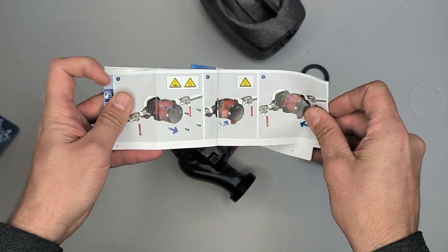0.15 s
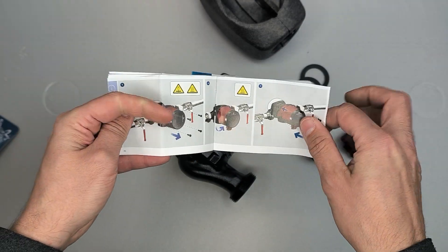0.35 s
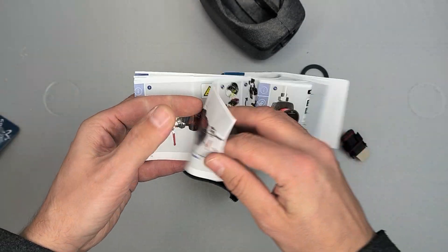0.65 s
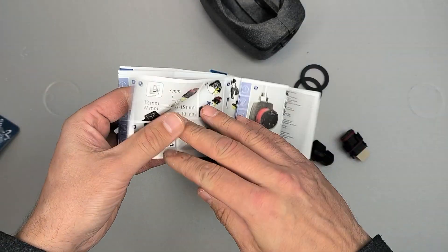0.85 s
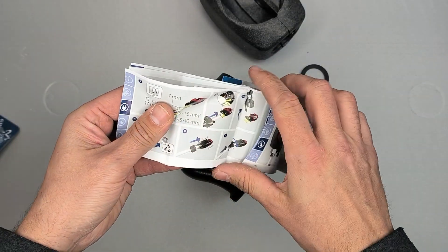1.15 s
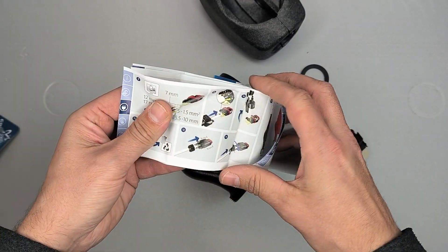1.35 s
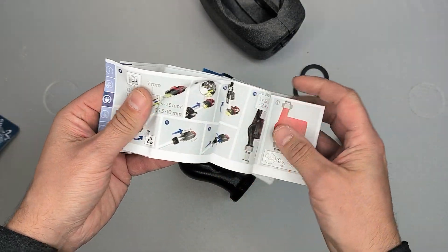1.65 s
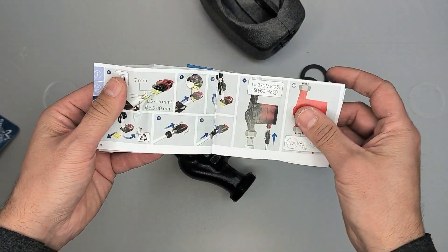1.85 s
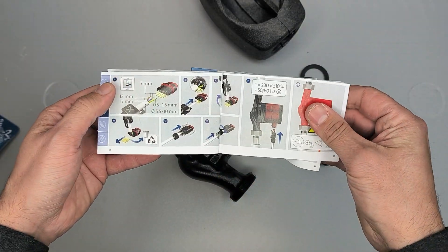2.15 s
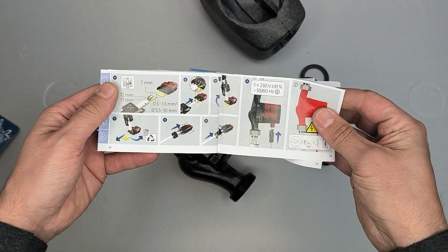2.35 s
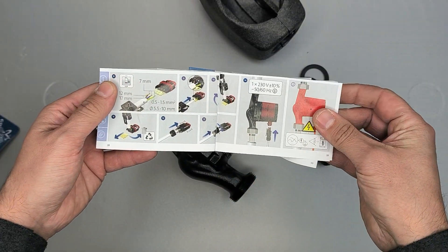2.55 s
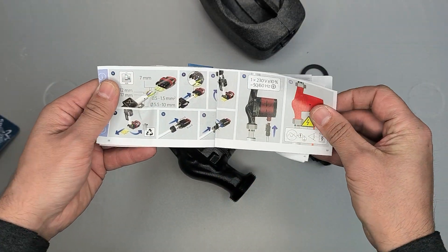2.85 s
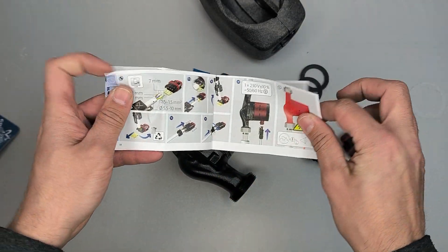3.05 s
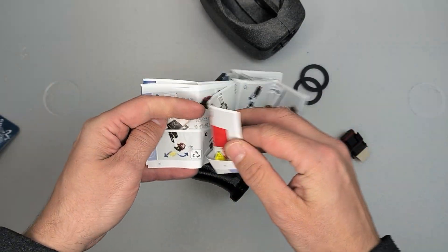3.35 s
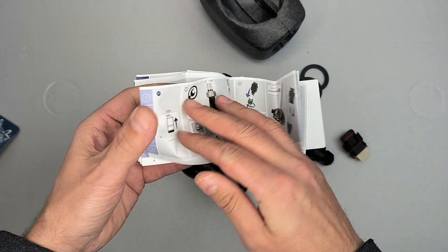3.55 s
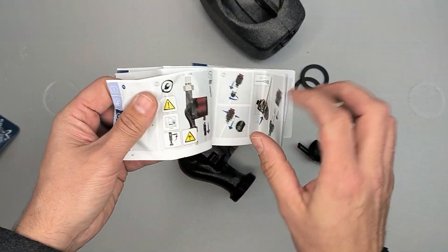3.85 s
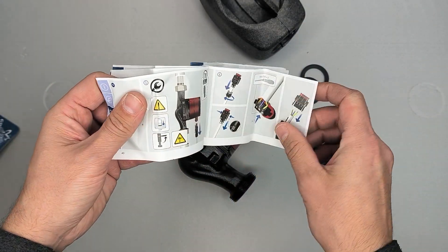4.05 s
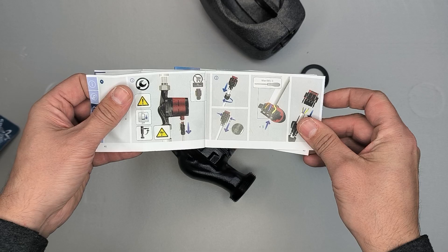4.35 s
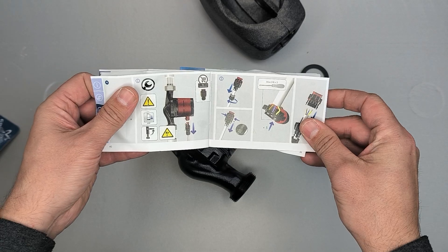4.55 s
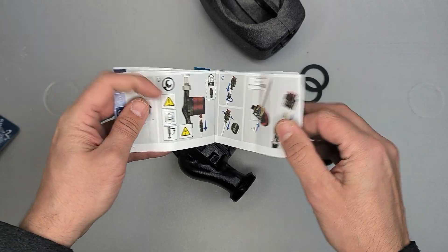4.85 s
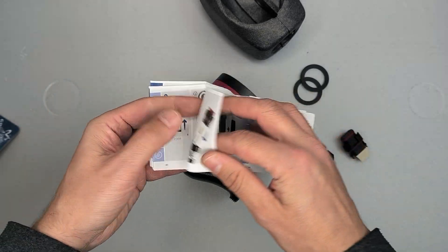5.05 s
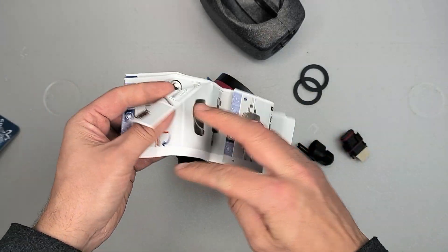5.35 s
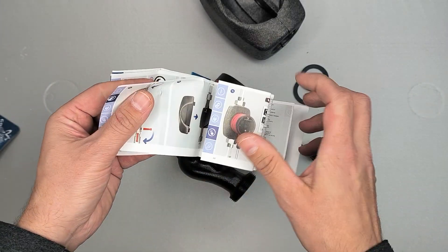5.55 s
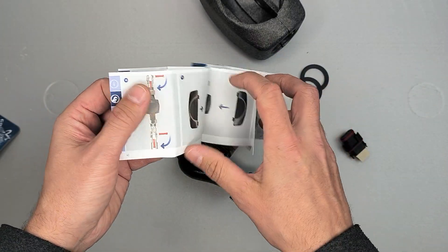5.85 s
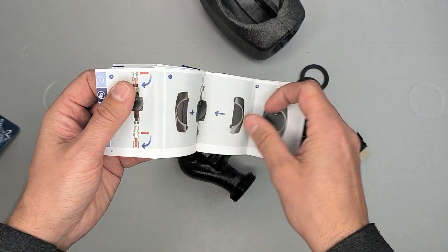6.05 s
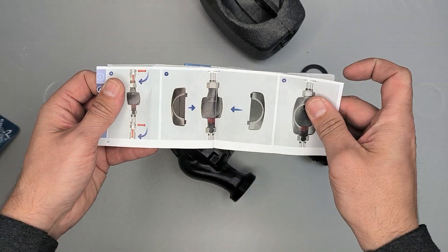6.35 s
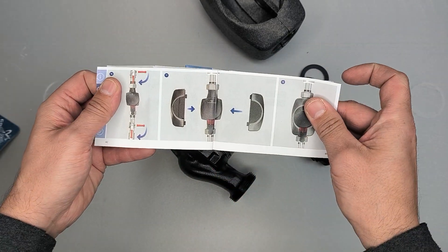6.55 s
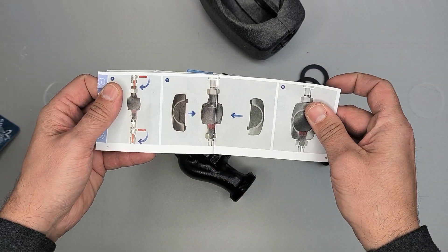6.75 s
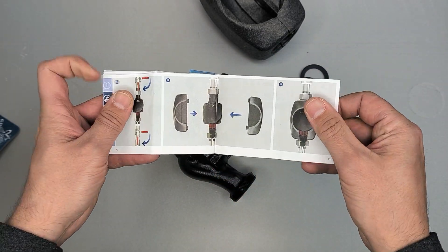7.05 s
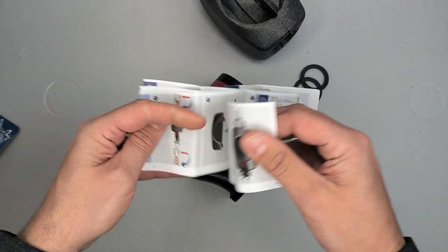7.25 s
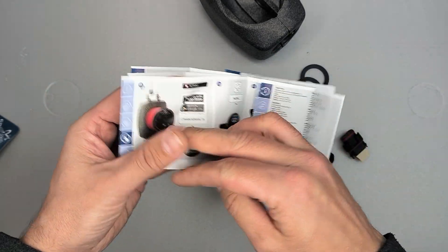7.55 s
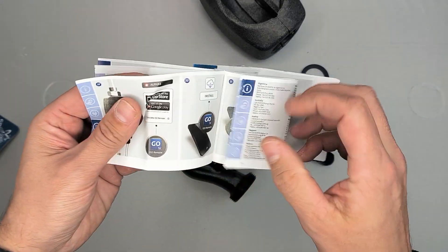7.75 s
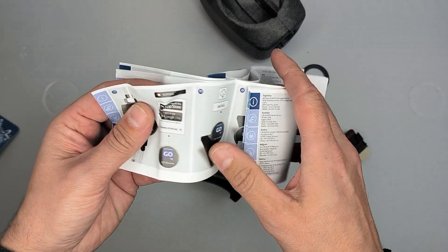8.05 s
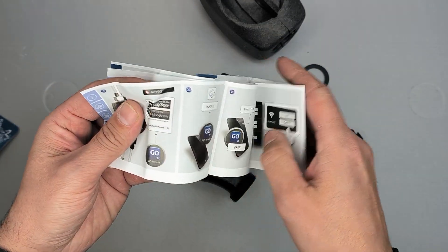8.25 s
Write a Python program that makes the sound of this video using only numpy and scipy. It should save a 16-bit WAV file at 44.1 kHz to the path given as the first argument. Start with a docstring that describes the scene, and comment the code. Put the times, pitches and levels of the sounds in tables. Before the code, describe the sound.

Two hands leaf through a small stiff folded leaflet close to a stereo microphone. Light finger rubs lead to a cluster of dry creasing snaps and papery swishes, then quiet handling. More page turns crackle in separate bursts, including one sharp snap near the middle and another near the end. A low fan hum drones steadily beneath, with short indoor reverberation and very faint hiss.

```python
"""Two hands unfold a stiff paper leaflet and turn its pages in a small room; a fan drones throughout.
Finger rubs (friction noise) open; creases snap (short noise bursts) in a tight cluster near 1 s.
Pages sweep over each other (swelling friction, ringing air pocket); snaps peak near 3.8 s.
An even riffle of seven ticks starts at 4.5 s; snaps continue, then thin out to faint ticks near 6.7 s.
Hard snaps return from 7 s and peak near 7.66 s; a last sweep and a light rub end the scene."""
import sys
import numpy as np
from scipy import signal
from scipy.fft import rfft, irfft
from scipy.io import wavfile

SR = 44100
rng = np.random.default_rng(int(sys.argv[2]) if len(sys.argv) > 2 else 0)


def pcm_store(signal):
    """Save signal as 16-bit PCM."""
    levels = np.round(np.clip(np.atleast_2d(signal), -1, 1) * 32767)
    wavfile.write(sys.argv[1], SR, levels.astype(np.int16).T)


N = 370881
HZ = np.fft.rfftfreq(N, 1 / SR)
TIME_S = np.arange(N) / SR
LEAD_S = 0.008  # snap envelopes start this long before the snap


def amp(db):
    """Decibels to gain."""
    return 10 ** (np.asarray(db) / 20)


def unit(x):
    """Scales to an rms of one."""
    return x / np.sqrt(np.mean(x ** 2) + 1e-20)


def read(points, hz):
    """Interpolates a frequency table on a log-frequency axis."""
    point_hz, value = np.transpose(points)
    return np.interp(np.log(hz + 1), np.log(point_hz + 1), value)


def bell(centre_hz, width_hz):
    """Power shape of one resonance, one at its centre."""
    return 1 / (1 + (2 * (HZ - centre_hz) / width_hz) ** 2)


def colour(x, gain_db):
    """Minimum-phase filter, built by folding the cepstrum of the gain over HZ."""
    cepstrum = irfft(np.log(amp(gain_db)), N)[:N // 2]
    cepstrum[1:] *= 2
    size = 2 ** 19
    response = irfft(np.exp(rfft(cepstrum, size)), size)[:2 ** 11]
    return signal.oaconvolve(x, response[None], axes=1)[:, :N]


def radiate(x, spectrum):
    """Colours a white drive with a spectrum and keeps its power."""
    gain_db = read(spectrum, HZ)
    mean_power = np.mean(amp(gain_db) ** 2)
    return colour(x, gain_db - 10 * np.log10(mean_power))


def wander(rate_hz):
    """Random curve of rms one, linear between rate_hz new values a second."""
    knots = rng.standard_normal(2 ** 14)
    return unit(np.interp(TIME_S * rate_hz, np.arange(len(knots)), knots))


def add(mix, start_s, sound):
    """Mixes a multichannel sound in at start_s."""
    part = mix[:, max(round(start_s * SR), 0):][:, :sound.shape[1]]
    part += sound[:, :part.shape[1]]


def snaps(rows, crack_same=0.73, thud_db=-9, thud_growth=1.9):
    """A crease flips in an instant; bending waves then scatter through the sheet. Drives: knock, 3 bands."""
    drives = np.zeros((4, 2, N))
    for snap_s, db, body_db, crisp_db, pan_db in rows:
        crack, flutter = snap_shapes(db)
        noise = rng.choice([-1., 1.], (5, len(crack)))
        # crack mostly alike at both microphones, flutter from all over the sheet
        crack_noise = np.sqrt(crack_same) * noise[0] + np.sqrt(1 - crack_same) * noise[1:3]
        burst = crack * crack_noise + flutter * noise[3:]
        burst *= amp(db) * unit(amp([[pan_db / 2], [-pan_db / 2]]))
        knock_db = thud_db + thud_growth * body_db  # the duller, the more knock
        shares = amp([knock_db, body_db, 0, crisp_db])
        shares /= np.linalg.norm(shares)
        for drive, share in zip(drives, shares):
            add(drive, snap_s - LEAD_S, share * burst)
    return drives


def snap_shapes(db, soft_rise_s=0.0023, hard_rise_s=0.00052, crack_s=0.0014,
                flutter_s=0.0073, flutter_db=-9, lead_in_db=-19, lead_in_s=0.0078):
    """Envelopes of a crack and its flutter: the harder the snap, the faster the crease flips."""
    t = np.arange(2 ** 11) / SR - LEAD_S
    rise_s = np.interp(db, [-50, -35], [soft_rise_s, hard_rise_s])
    before, after = np.maximum(-t, 0), np.maximum(t, 0)
    flip = np.exp(-(before / rise_s) ** 2)
    lead_in = amp(lead_in_db) * np.exp(-before / lead_in_s)  # a faint lead-in swells before the flip
    crack = flip * np.exp(-after / (crack_s + rise_s - hard_rise_s))
    flutter = np.maximum(amp(flutter_db) * flip, lead_in) * np.exp(-after / flutter_s)
    # same energy as 6 ms at full level
    scale = np.sqrt(0.006 * SR / np.sum(crack ** 2 + flutter ** 2))
    return scale * crack, scale * flutter


# Buckling creases and flicked edges. Each row: time in seconds, level in dB, body in dB re the middle
# band, crispness in dB re the middle band, left minus right in dB.
CREASES = [(0.0354, -37, -8, -1.5, 12), (0.5543, -45, 2.5, -26, -2), (0.7447, -46, 7, -16, 1),
           (0.905, -43, -6, -10, -3), (1.0075, -31.5, -10, -4, 0), (1.0164, -31.5, -4, -8, -3),
           (1.0327, -29, -24, -1, 5), (1.037, -30, -7, -2, 0), (1.1441, -44, -1, -5, 2),
           (1.3585, -40, -2, 3, 2), (1.378, -36, -15, -1, -18), (1.385, -33, -3.5, 2, 4),
           (1.577, -37, 1, -6, -4), (1.799, -33, -6.5, -1.5, -9), (1.8635, -40.5, -25, -21, -2),
           (2.8731, -43.5, 3, 7, 3), (3.0447, -33.5, -6.5, -27, -2), (3.16, -29.5, -15, -3.5, 5),
           (3.1712, -34, -4.5, -11, -2), (3.3163, -37.5, 3.5, -28, -3), (3.4475, -32, -1, -10, -1),
           (3.4808, -28.5, -5, -9, -11), (3.4851, -33, -3, -12, 0), (3.4925, -26.5, -10, 0, 2),
           (3.6075, -27.5, -6, 10, -0.5), (3.782, -36, -5.5, -6, -3), (3.8081, -20, -7.5, -7, -3),
           (4.3112, -47, -15, -10, 2), (4.7185, -35.5, 1.5, -22, -1), (4.7414, -27, -15, -15, 0.5),
           (4.874, -41.5, -14, -9, 15), (5.0694, -49, 3, -2, 0), (5.1903, -36.5, -4, 1, -1),
           (5.3682, -34.5, -1, -5, -9), (5.3846, -35, -6, -3, 1), (5.4189, -28.5, -10, -7, 0),
           (5.4326, -33.5, -23, -5, 10), (5.9326, -28, -4, -17, -2), (6.381, -40, -18, 0, -2),
           (6.4964, -46.5, -8, -12, -1), (6.5838, -56.5, -16, 1, 13), (6.691, -54, 0, 4, -1),
           (6.8293, -53, 0, -4, 0), (7.0523, -25.5, -12, 0.5, 1), (7.0775, -26.5, -9, -3, -0.5),
           (7.164, -31.5, -6, -16, -0.5), (7.3887, -38, 7, -2, 3), (7.469, -29, -9, -16, 1),
           (7.5024, -31.5, -9, -6, 0), (7.6422, -35, -25, -8, 1), (7.6562, -21, -12.5, -5.5, 0.5),
           (7.7016, -40.5, -5, -3, -5), (8.1002, -47, 0, -6, -2)]


def creases():
    """Stiff creases buckle and edges flick: dry snaps at set times."""
    return list(CREASES)


# Fingertips landing on the leaflet. Each row: time in seconds, level in dB before level_db.
FINGER_TAPS = [(0.205, -47.5), (0.434, -47.5), (0.6056, -47.5), (1.887, -50.5), (2.202, -55), (2.2434, -52),
               (3.3805, -45), (4.0812, -53), (4.203, -50.5), (4.3027, -43.5), (4.893, -49), (6.1794, -53),
               (6.3, -51), (6.323, -50.5), (7.32, -48)]


def taps(body_db=8, crisp_db=-3, level_db=1):
    """A fingertip is a soft, dull blow in the middle of the sheet."""
    return [(tap_s, db + level_db, body_db, crisp_db, 0) for tap_s, db in FINGER_TAPS]


def riffle(start_s=4.5065, period_s=0.0273, first_db=-51, last_db=-40, body_db=1, crisp_db=0, count=7):
    """A thumb drags the sheet taut, catching and slipping at an even pace, a little harder each time."""
    levels_db = np.linspace(first_db, last_db, count)
    return [(start_s + k * period_s, db, body_db, crisp_db, 0) for k, db in enumerate(levels_db)]


# A page sweeps over the sheet below. Each row: time of greatest force in seconds, rise in seconds,
# fall in seconds, level in dB before level_db or lift_db, body in dB re the middle band, crispness in
# dB re the middle band, air pocket in Hz, its ring in dB re the friction before ring_db.
PAGE_SWEEPS = [(0.777, 0.028, 0.018, -41.5, -3.5, -2.5, 2720, -6),
               (0.811, 0.019, 0.027, -44, -1.5, -12, 3000, -1), (1.02, 0.06, 0.034, -51.5, 1, -13, 2240, 3),
               (1.23, 0.011, 0.015, -48, -5, -3, 2640, 3), (1.395, 0.036, 0.023, -52, 1, -4, 1940, -18),
               (1.582, 0.034, 0.036, -42.5, -6, -1.5, 1910, -3.5),
               (1.801, 0.046, 0.032, -41.5, -5.5, -3, 2240, -7),
               (1.88, 0.029, 0.027, -48, -7, -7, 2170, -11), (3.322, 0.022, .025, -61, 9, -16, 2280, -1),
               (3.484, 0.044, 0.066, -46, -4, -5, 2400, -13), (3.812, 0.018, .022, -42, -7, -5, 2300, -6),
               (4.746, 0.051, 0.059, -51, -9, -2, 2440, -22), (5.185, 0.062, 0.034, -48, -4, -4, 1940, -21),
               (5.384, 0.02, 0.039, -44, -4, -1, 2430, -2.5),
               (7.459, 0.021, .055, -42.5, -3.5, -3.5, 1870, -8),
               (7.69, 0.037, 0.099, -59, -13, -3, 2350, 3),
               (8.195, 0.043, 0.043, -50.5, -12.5, -4.5, 2360, -5),
               (8.282, 0.014, 0.015, -47, -13.5, -3, 2400, -18)]


def sweeps(level_db=-1, patchy_db=2.5, pocket_width_hz=330, ring_db=-1,
           flex_octaves=0.056, roundness=1.38, count=2 ** 15):
    """Force builds and lets go as a page sweeps; the air pocket under it rings. Three band drives, ring."""
    scrape = friction(grain=0.78, slips_per_s=850, spread_db=1.0, uneven_db=4.0)
    flex = wander(30)
    drives, ring = np.zeros((3, 2, N)), np.zeros((2, N))
    for peak_s, rise_s, fall_s, db, body_db, crisp_db, pocket_hz, pocket_db in PAGE_SWEEPS:
        middle = round(peak_s * SR)
        span = slice(middle - count // 2, middle + count // 2)
        t = TIME_S[span] - peak_s
        force = np.exp(-abs(t / np.where(t < 0, rise_s, fall_s)) ** roundness)
        drive = scrape[:, span] * amp(db + level_db) * force
        drives[:, :, span] += amp([body_db, 0, crisp_db])[:, None, None] * drive
        moving_hz = pocket_hz * 2 ** (flex_octaves * flex[span])  # wavers as the sheet flexes
        ring[:, span] += resonate(drive * amp(pocket_db + ring_db), moving_hz, pocket_width_hz)
    # each slip shakes a different part of the sheet, so the bands flicker apart
    patchy = [band * unit(amp(patchy_db * wander(150))) for band in drives]
    return np.array(patchy), ring


def crinkles(lift_db=-4, spread_db=2, scatter_db=4, count=5):
    """Each sweeping page buckles in a few small places around its moment of greatest force."""
    rows = []
    for peak_s, rise_s, fall_s, db, body_db, crisp_db, _, _ in PAGE_SWEEPS:
        places = (np.arange(count) + rng.random(count)) / count
        for place, (size, tone, side) in zip(places, rng.standard_normal((count, 3))):
            crinkle_s = peak_s - rise_s + place * (rise_s + fall_s)
            rows.append((crinkle_s, db + lift_db + spread_db * size,
                         body_db + scatter_db * tone, crisp_db, scatter_db * side))
    return rows


# Fingers brushing along a page. Each row: start in seconds, length in seconds, level in dB before
# level_db or lift_db, crispness in dB re the middle band.
FINGER_RUBS = [(0.0, 0.026, -47.5, 0.5), (0.074, 0.067, -58.5, -1), (0.16, 0.08, -55, 0.5),
               (0.332, 0.079, -58, 1.5), (0.401, 0.04, -54.5, -1), (0.486, 0.11, -57, -7.5),
               (0.653, 0.059, -59.5, -3), (0.861, 0.038, -52.5, -3), (0.928, 0.058, -48.5, 0),
               (1.11, 0.076, -55, -3), (1.258, 0.15, -56, -7), (1.43, 0.086, -52, -9),
               (1.463, 0.12, -49, -5), (1.622, .13, -51.5, -3.5), (1.906, 0.094, -58.5, -1.5),
               (2.024, .11, -54.5, -1.5), (2.18, 0.065, -56.5, 0.5), (2.352, .11, -56.5, 2.5),
               (2.51, 0.07, -64, 1), (2.627, 0.15, -55, 1.5), (2.871, 0.14, -54.5, -1.5),
               (3.05, 0.12, -45, -3.5), (3.2, 0.34, -61, -2), (3.56, 0.043, -49, -6),
               (3.588, 0.023, -49, -2), (3.641, 0.078, -49, -2), (3.898, .11, -57.5, 1),
               (4.076, 0.084, -60, -2.5), (4.217, 0.041, -57.5, 1), (4.254, 0.063, -50.5, -3),
               (4.369, .06, -55.5, -1), (4.453, 0.19, -62.5, -3), (4.763, 0.1, -54, 1.5),
               (4.977, 0.031, -58, 1), (5.067, 0.074, -59, -5), (5.238, .1, -58, 1),
               (5.513, 0.043, -54.5, 2.5), (5.613, 0.064, -61.5, 2.5), (5.716, 0.16, -60, 0),
               (5.893, 0.036, -52, 1), (5.966, .07, -58, -4), (6.145, .31, -56, -2.5),
               (6.963, 0.21, -54.5, 0.5), (7.217, 0.2, -58, -4), (7.395, 0.045, -47, -1),
               (7.547, 0.06, -65, -1), (7.702, 0.11, -70, 0), (7.817, 0.072, -54.5, -8),
               (7.971, 0.16, -54, -4.5), (8.324, 0.081, -63.5, 0)]


def rubs(attack_s=0.006, release_s=0.034, level_db=-1, body_db=-64, body_growth=0.66,
         light_db=-57, holding_db=-72):
    """A finger starts fast, slides evenly, lifts off; pressing adds more hiss than body. Three band drives."""
    power = np.zeros((3, N)) + amp(holding_db) ** 2  # hands that only hold the leaflet still stir it
    t = np.arange(SR // 2) / SR
    for start_s, length_s, db, crisp_db in FINGER_RUBS:
        envelope = np.minimum(t / attack_s, 1) * np.exp(-np.maximum(t - length_s, 0) / release_s)
        bands = amp([body_db + body_growth * (db - light_db), db, db + crisp_db])
        add(power, start_s, np.outer(bands * amp(level_db), envelope) ** 2)
    scrape = friction(grain=0.27, slips_per_s=1500, spread_db=3.5, uneven_db=2.0)
    return np.sqrt(power)[:, None] * scrape


def ticks(lift_db=1, spread_db=2, body_db=0, scatter_db=5):
    """Somewhere along each rub the finger catches once."""
    rows = []
    for start_s, length_s, db, crisp_db in FINGER_RUBS:
        size, tone, side = rng.standard_normal(3)
        rows.append((start_s + rng.random() * length_s, db + lift_db + spread_db * size,
                     body_db + scatter_db * tone, crisp_db, scatter_db * side))
    return rows


def friction(grain, slips_per_s, spread_db, uneven_db, slip_s=0.00022):
    """Fibres catch and slip: a white stereo drive, from fine hiss (grain 0) to crackle (grain 1)."""
    size_db = spread_db * np.minimum(rng.exponential(1, N), 3.5)
    slips = (rng.random(N) < slips_per_s / SR) * amp(size_db) ** 2
    slip_power = signal.lfilter([1], [1, -np.exp(-1 / (slip_s * SR))], slips)
    texture = np.sqrt(1 - grain + grain * slip_power / slip_power.mean())
    return texture * rng.standard_normal((2, N)) * amp(uneven_db * wander(90))


def resonate(x, hz, width_hz):
    """Moving resonance: shifts hz to zero, smooths, shifts back; keeps the power of white noise."""
    turn = np.exp(2j * np.pi * np.cumsum(hz) / SR)
    r = np.exp(-np.pi * width_hz / SR)
    smooth = signal.lfilter([(1 - r) ** 2], [1, -2 * r, r ** 2], x / turn)
    return (turn * smooth).real * np.sqrt(8 / (1 - r))


def fold_ring(drive, hz=2750, width_hz=800, ring_db=-5):
    """The sheet bending in snaps and rubs rings the air in the folds."""
    return resonate(drive * amp(ring_db), np.full(N, hz), width_hz)


# Relative spectra of the knock of a fingertip or limp page, the bending sheet, the middle band and
# the crisp edge. Each row: frequency in Hz, density in dB per Hz.
KNOCK_SPECTRUM = [(250, -21), (600, -17.5), (950, 1.5), (1250, -2), (1700, -9), (4000, -39)]
SHEET_SPECTRUM = [(300, -18.5), (650, -3.5), (1050, -11), (1400, 0.5), (1950, 4), (2400, 7), (3200, -4.5),
                  (6000, -46)]
MIDDLE_SPECTRUM = [(1200, -60), (2000, -31), (2600, -2.5), (3800, 0), (5200, 5.5), (7200, 8.5),
                   (8200, -1.5), (11000, -29.5)]
EDGE_SPECTRUM = [(5000, -46), (7000, 6), (8100, 3), (9500, 1.5), (11500, -3.5), (13500, -6), (16000, -10)]


def leaflet(knock, body, middle, crisp):
    """The paper radiates each drive with its own spectrum."""
    dull = radiate(knock, KNOCK_SPECTRUM) + radiate(body, SHEET_SPECTRUM)
    bright = radiate(middle, MIDDLE_SPECTRUM) + radiate(crisp, EDGE_SPECTRUM)
    return dull + bright


# Decay of the room. Each row: frequency in Hz, t60 in seconds.
DECAY_T60 = [(700, 0.95), (2100, 0.61), (5500, 0.51), (9000, 0.39), (15000, 0.47)]


def room(x, echoes_db=-12, tail_db=-8, onset_s=0.00091, echo_count=8):
    """A few quick echoes from the table top and hands, then a diffuse tail."""
    hz, t, z = signal.stft(rng.standard_normal((2, 2 ** 15)), SR, nperseg=256)
    decay = amp(-60 * t / read(DECAY_T60, hz)[:, None])
    tail = signal.istft(z * decay, SR, nperseg=256)[1]
    tail *= np.clip(np.arange(tail.shape[1]) / SR / onset_s, 0, 1)
    response = amp(tail_db) * tail / np.linalg.norm(tail[0])
    for side in response:
        delays = (rng.uniform(0.0016, 0.012, size=echo_count) * SR).astype(int)
        signs = rng.choice([-1, 1], size=echo_count)
        side[delays] += amp(echoes_db) * signs / np.sqrt(echo_count)
    return signal.fftconvolve(x, response, axes=1)[:, :N]


# Relative spectrum of the fan's air noise. Each row: frequency in Hz, density in dB per Hz.
AIR_SPECTRUM = [(25, -53), (70, -42.5), (86, -20), (150, -20.5), (178, -28.5), (210, -15.5), (330, -11.5),
                (440, -16), (490, -26), (760, -29.5), (950, -40.5), (1500, -44), (3000, -61), (9000, -67)]
# Resonances the air noise excites. Each row: frequency in Hz, width in Hz, lift in dB.
AIR_MODES = [(143, 14, 3.5), (260, 9.6, 5.5), (271.7, 4.7, 15.5), (285.5, 14.4, 10.5), (346.3, 9.7, 7),
             (357, 9.2, 11.5), (380.8, 8.5, 15), (449, 8.6, 1.5)]
# Likeness of the air noise at the two microphones. Each row: frequency in Hz, coherence from 0 to 1.
AIR_COHERENCE = [(60, 1), (130, 0.7), (290, 0.94), (400, 0.72), (640, 0.078), (1400, 0), (3000, 0.0029)]
# Tones of the fan. Each row: mean frequency in Hz, rms level in dB before wavering.
TONES = [(107.9, -61), (281.8, -48.5), (363.7, -46.5), (508, -70), (586, -77.5), (728, -75.5)]


def fan(air_db=-37.5, waver_db=3.5, drift_hz=0.875):
    """Air noise booming in a few low resonances, with wavering tones."""
    size = 2 ** 19
    hz = np.fft.rfftfreq(size, 1 / SR)
    air_shape_db = read(AIR_SPECTRUM, HZ) + sum(db * bell(f, width) for f, width, db in AIR_MODES)
    left, other = rfft(rng.standard_normal((2, size)))
    same = np.clip(read(AIR_COHERENCE, hz), -1, 1)
    pair = np.array([left, same * left + np.sqrt(1 - same ** 2) * other])
    air = unit(irfft(pair * amp(np.interp(hz, HZ, air_shape_db)))[:, :N])
    tones = np.zeros(N)
    for tone_hz, db in TONES:
        phase = 2 * np.pi * np.cumsum(tone_hz + drift_hz * wander(5)) / SR
        tones += amp(db + waver_db * wander(4)) * unit(np.sin(phase))
    return amp(air_db) * air + tones


# Relative spectrum of the hiss. Each row: frequency in Hz, density in dB per Hz.
HISS_SPECTRUM = [(500, -2), (2200, 7), (3800, -3), (7000, -2), (9000, -31), (12000, -13), (15500, 2.5)]


def hiss(level_db=-67):
    """Faint even noise, unrelated at the two microphones."""
    return amp(level_db) * radiate(rng.standard_normal((2, N)), HISS_SPECTRUM)


def scene():
    """The leaflet in its room, over the fan and hiss."""
    knock, *cracks = snaps([*creases(), *taps(), *riffle(), *crinkles(), *ticks()])
    handling = np.array(cracks) + rubs()
    turning, pocket_ring = sweeps()
    body, middle, crisp = handling + turning
    paper = leaflet(knock, body, middle, crisp) + pocket_ring + fold_ring(handling[0])
    return paper + room(paper) + fan() + hiss()


# Resonances of the microphone ports. Each row: frequency in Hz, width in Hz, left lift in dB,
# right lift in dB.
PORT_MODES = [(6040, 1100, 2.5, -5), (7570, 810, 0.5, -12), (8360, 210, 0, 8.5), (8900, 2420, -10, -0.5),
              (10790, 310, 5, 5.5), (11600, 1240, -0.5, 4)]


def record(dry, cutoff_hz=15900):
    """Each microphone port colours the treble; a low-pass then limits the band."""
    left_db = sum(db * bell(hz, width) for hz, width, db, _ in PORT_MODES)
    right_db = sum(db * bell(hz, width) for hz, width, _, db in PORT_MODES)
    heard = np.vstack([colour(dry[:1], left_db), colour(dry[1:], right_db)])
    low_pass = signal.firwin(401, cutoff_hz, window=("kaiser", 8), fs=SR)
    return signal.oaconvolve(heard, low_pass[None], "same")


dry = scene()
out = record(dry)
pcm_store(out)
```